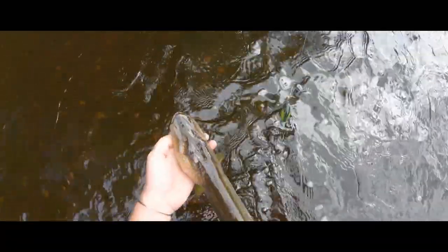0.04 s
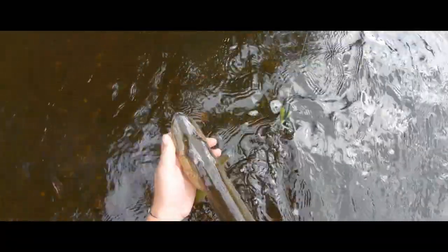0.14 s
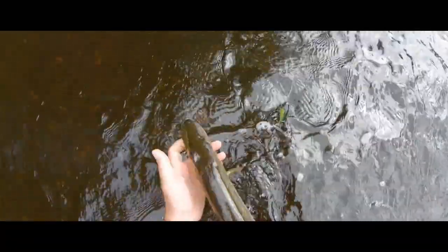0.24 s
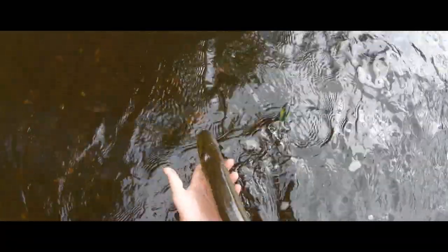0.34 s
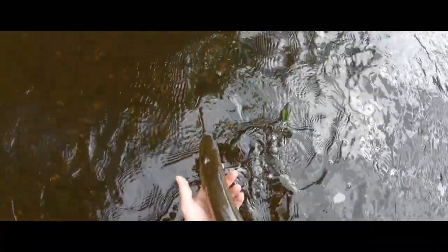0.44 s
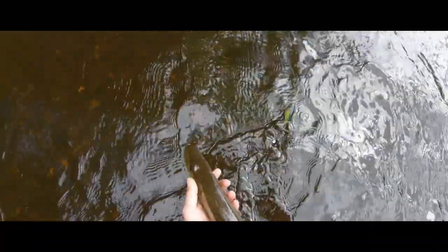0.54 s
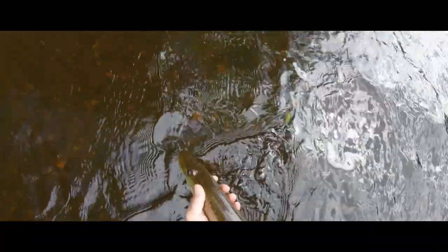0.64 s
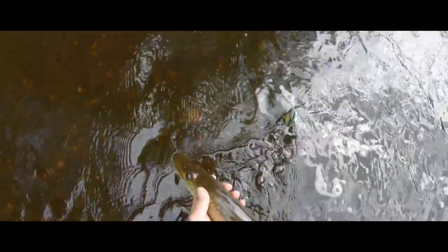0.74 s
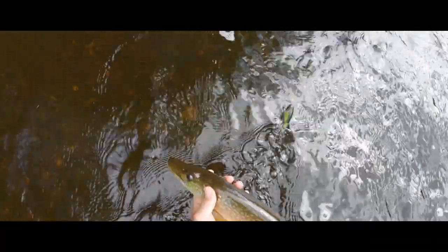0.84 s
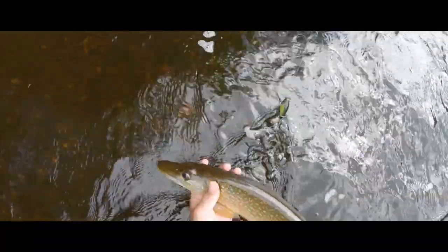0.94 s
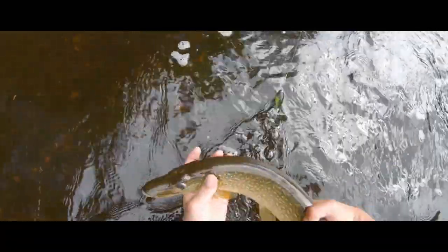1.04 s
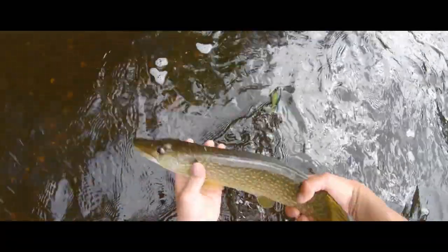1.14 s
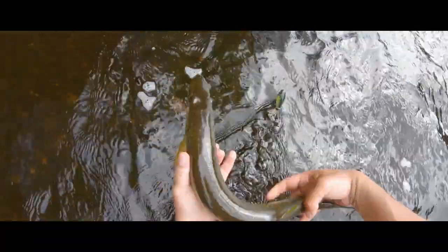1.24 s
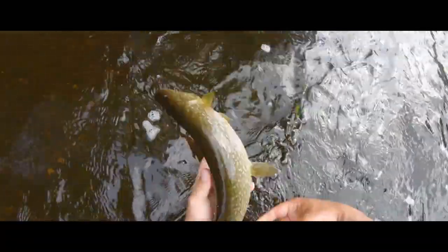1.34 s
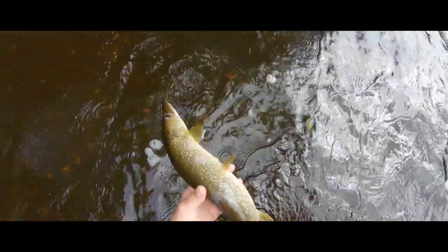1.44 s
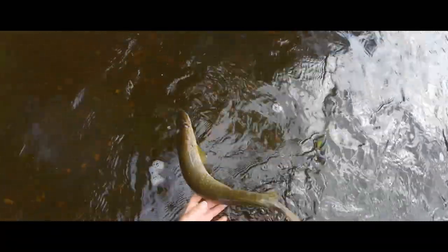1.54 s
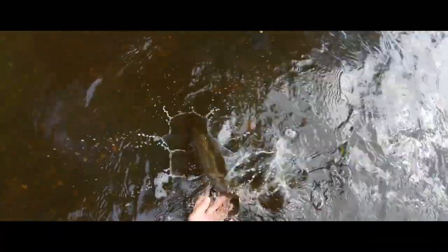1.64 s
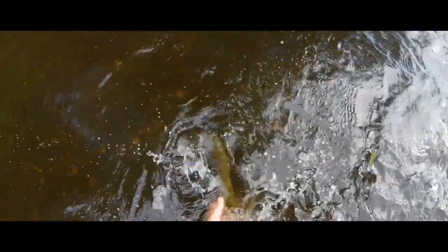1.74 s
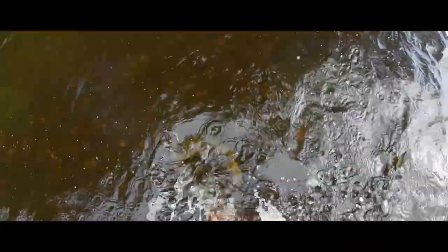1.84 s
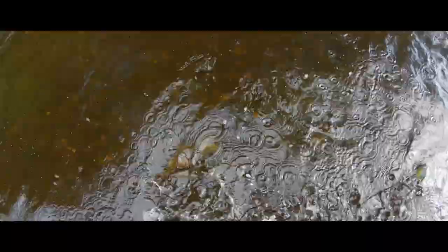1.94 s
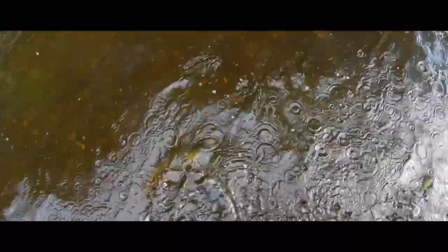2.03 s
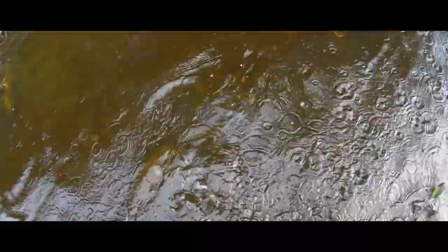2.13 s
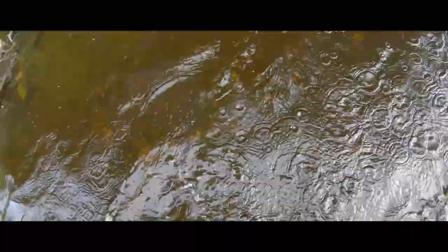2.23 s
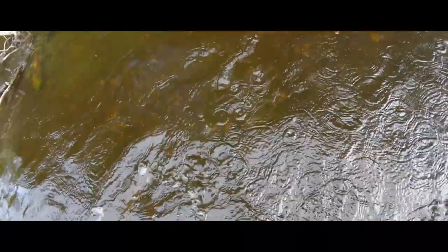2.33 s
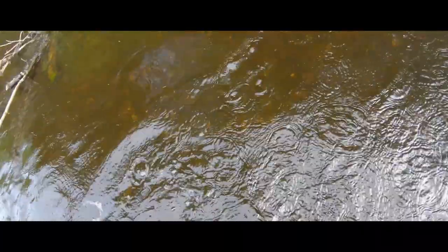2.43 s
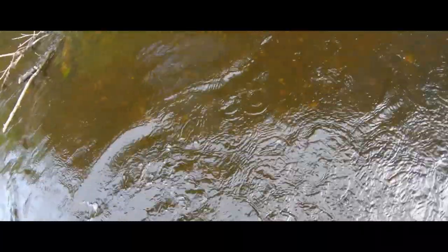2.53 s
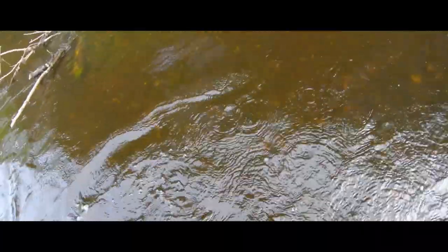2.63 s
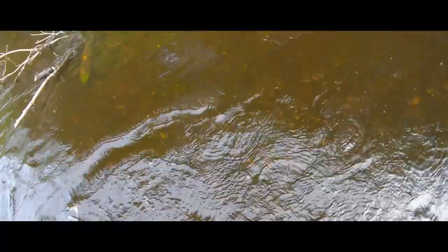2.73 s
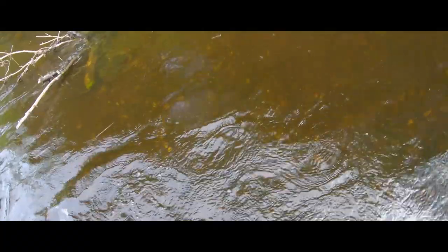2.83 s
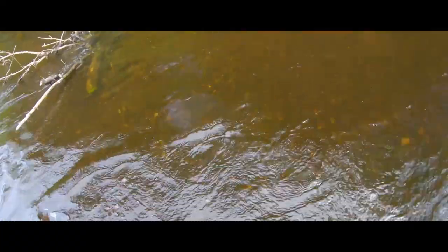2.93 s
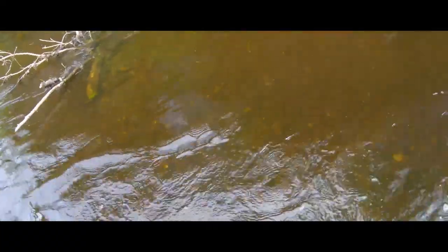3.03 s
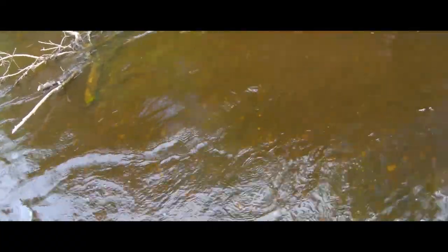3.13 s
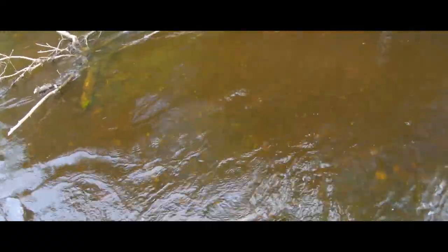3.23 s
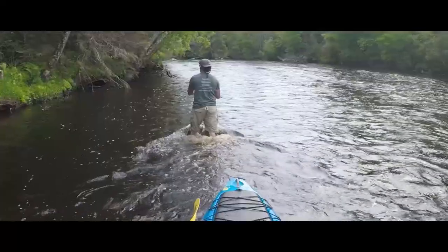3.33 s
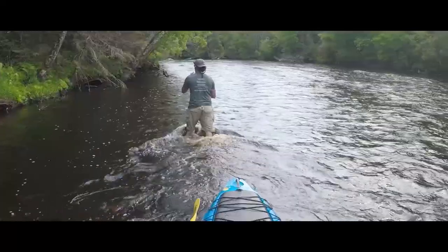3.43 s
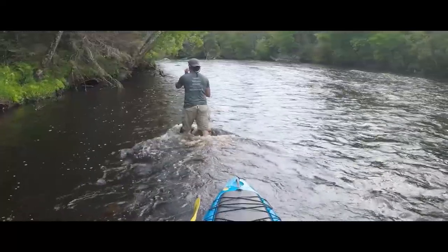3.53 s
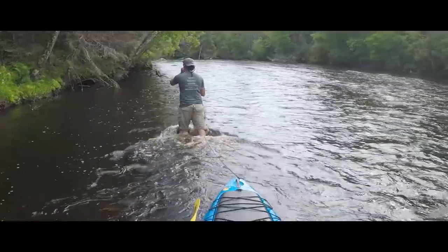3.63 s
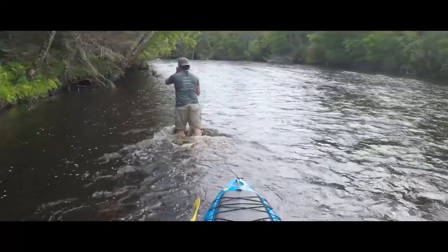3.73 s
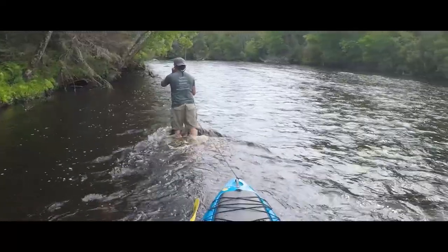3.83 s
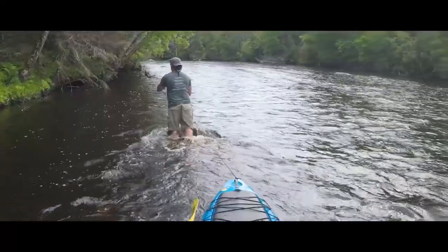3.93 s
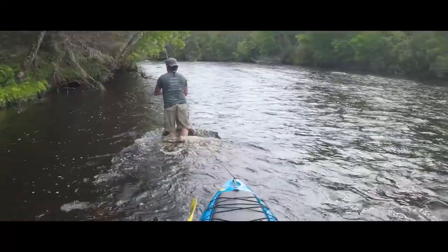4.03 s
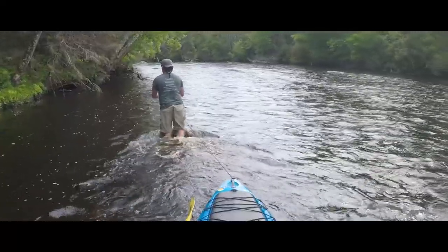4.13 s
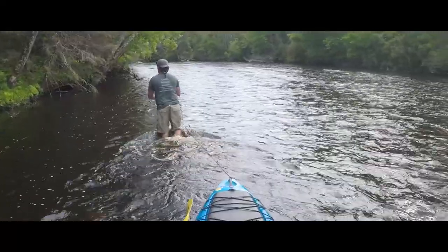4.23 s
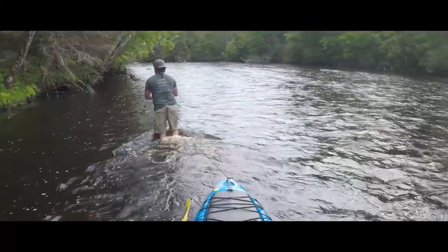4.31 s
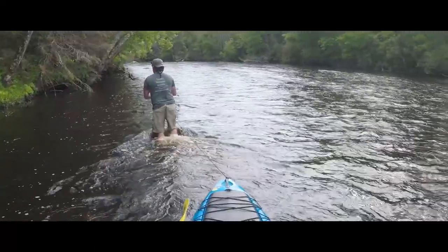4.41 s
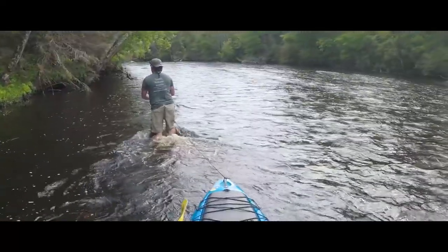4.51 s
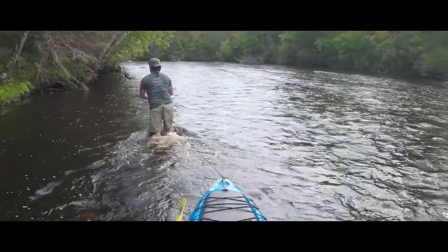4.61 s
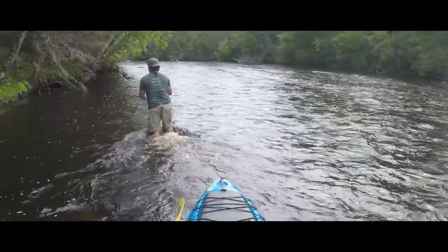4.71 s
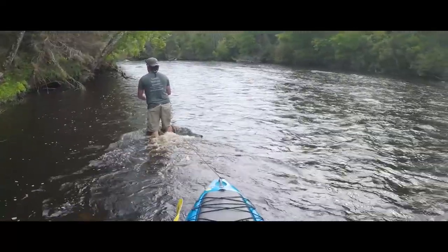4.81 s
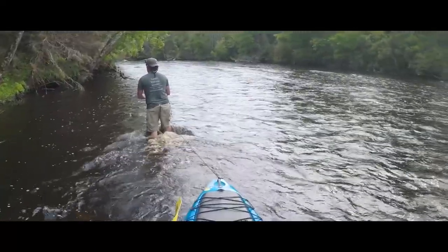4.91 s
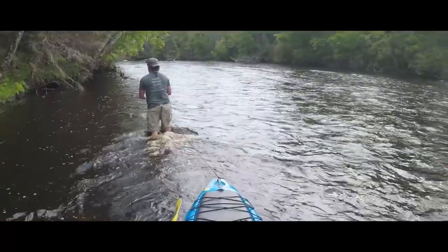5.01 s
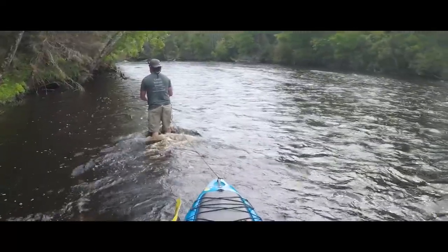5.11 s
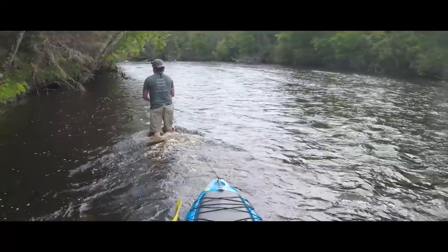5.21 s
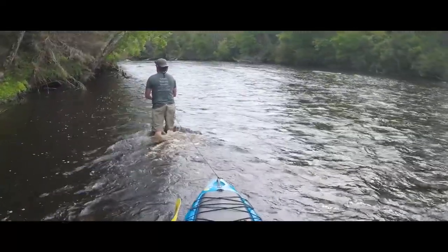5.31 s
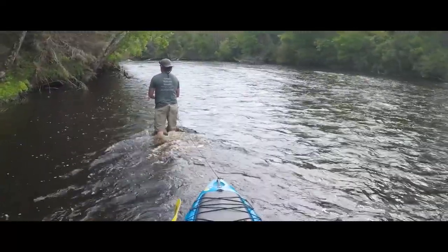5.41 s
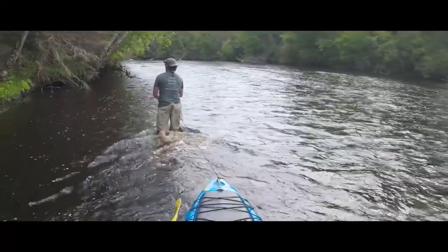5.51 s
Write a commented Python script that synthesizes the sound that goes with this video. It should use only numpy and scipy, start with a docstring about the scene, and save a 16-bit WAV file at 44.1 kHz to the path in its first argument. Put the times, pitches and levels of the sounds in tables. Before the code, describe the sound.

Shallow river water gurgles close up, a fish slaps and thrashes free in a splash, then an abrupt cut to steady midstream rush with low rumble.

```python
"""A shallow river gurgles over rocks at arm's length, mostly noise and crowds of ringing bubbles in stereo.
A fish slaps close to the camera's microphones, thrashes free and leaves spray (impacts) and chirping bubbles.
Then the place jumps to a kayak in midstream, in mono: an even rush of noise, burbling bubbles,
drips ticking on the boat, and the low rumble of the current buffeting the hull."""
import sys
import numpy as np
from scipy import signal
from scipy.fft import rfft, irfft
from scipy.io import wavfile
from scipy.ndimage import uniform_filter1d

SR = 44100
rng = np.random.default_rng(int(sys.argv[2]) if len(sys.argv) > 2 else 0)


def digitize_waveform(pressure):
    """Quantize a signal to 16-bit integers and store it at the path in sys.argv[1].

    Rows of a 2-D input are taken as channels; values are limited to [-1, 1].
    """
    field = np.atleast_2d(pressure).T
    bounded = np.clip(field, -1, 1)
    quanta = np.round(bounded * 32767).astype(np.int16)
    wavfile.write(sys.argv[1], SR, quanta)


N = 245195
TIME = np.arange(N) / SR
CUT_S = 3.312  # the microphones leave the shallows for the kayak

# balance of the two microphone ports over the shallows: f/Hz, left-right level/dB
PORT_BALANCE = [(200, -0.5), (380, 1), (700, -6), (1290, -10.5), (2400, -6.5), (4400, -3.5), (8100, -4.5),
                (15000, 3.5)]
# spectrum of the hiss when water hits water or the camera: f/Hz, level/dB
SPLASH_TICK = [(500, -5), (2500, 16.5), (4500, 15.5), (7000, 8), (9400, 3.5), (11500, -1.5), (16000, -11)]
# strokes of the fish's tail: t/s, slap level/dB, sharpness 0-1, foam level/dB, foam decay/s, cavity f/Hz
TAIL_STROKES = [(1.670, -8.5, 0.86, -37.5, 0.036, 544), (1.780, -4, 0.58, -28.5, .004, 303),
                (1.8012, -10.5, 0.2, -30, 0.027, 720), (1.8188, -13, 0.6, -34, 0.039, 377),
                (1.8397, -7, 0.2, -31.5, 0.0067, 660), (1.852, -16, 0.2, -31, 0.0061, 320),
                (1.8725, -23, .25, -34.5, 0.015, 480)]


def gain_of(db):
    """Decibels to gain."""
    return 10 ** (np.asarray(db) / 20)


def evened(x):
    """Scales to an rms of 1."""
    return x / np.sqrt(np.mean(x ** 2) + 1e-20)


def read(points, hz):
    """Reads a spectrum table on a log-frequency axis."""
    f, value = np.transpose(points)
    return np.interp(np.log(hz + 1), np.log(f + 1), value)


def add(mix, s, sound):
    """Mixes a sound in at time s."""
    part = mix[:, max(round(s * SR), 0):][:, :sound.shape[-1]]
    part += sound[..., :part.shape[1]]


def swell(crest_s, db, half_s):
    """A smooth rise and fall of gain around a crest."""
    return gain_of(db) * np.exp(-.5 * ((TIME - crest_s) / half_s) ** 2)


def burst(s, db, decay_s, attack_s):
    """A gain that rises quickly at time s and dies away."""
    age = np.maximum(TIME - s, 0)
    attack = np.minimum(age / attack_s, 1)
    return gain_of(db) * attack * np.exp(-np.maximum(age - attack_s, 0) / decay_s)


def clumps(depth_db, per_s):
    """A gain that wanders at random, for things that arrive in bunches."""
    slowness = 1 + (np.fft.rfftfreq(N, 1 / SR) / per_s) ** 4
    wander = irfft(rfft(rng.standard_normal(N)) / slowness, N)
    return gain_of(depth_db * evened(wander))


def ports(side_db):
    """Left and right gains with a mean of 1."""
    left = gain_of(side_db)
    return np.array([2 * left, 2 + 0 * left]) / (1 + left)


def colour(x, spectrum):
    """Gives a sound a spectrum, causally, so that clicks keep their sharp fronts."""
    size = 4096
    log_gain = np.log(gain_of(read(spectrum, abs(np.fft.fftfreq(size, 1 / SR)))))
    minimum_phase = np.exp(np.conj(signal.hilbert(log_gain)))
    taps = np.fft.ifft(minimum_phase).real[:size // 2]
    return signal.fftconvolve(x, taps)[:len(x)]


def spread(pair):
    """Two unrelated sounds become one that leans mostly to the right of the two ports."""
    # likeness of the two ports: f/Hz, share 0-1
    port_likeness = [(60, 0.077), (290, 0.92), (640, 0.78), (1400, 0.6), (3100, 0.45), (6800, 0.043),
                     (15000, 0.048)]
    hz, (a, b) = np.fft.rfftfreq(N, 1 / SR), rfft(pair)
    same = read(port_likeness, hz)
    mid, side = a * np.sqrt(1 + same), b * np.sqrt(1 - same)
    out = irfft(np.array([mid + side, mid - side]) * ports(read(PORT_BALANCE, hz)), N)
    return out / out.mean(0).std()


def wash(spectrum, patchy_db):
    """Countless far bubbles: noise whose level wanders in small patches of time and pitch."""
    hz = np.fft.rfftfreq(1024, 1 / SR)
    a, b, patches = rng.standard_normal((N // 256 + 5, len(hz), 3)).T
    patches = uniform_filter1d(patches, size=7, axis=0)  # across pitch
    patches = evened(uniform_filter1d(patches, size=4, axis=1))  # across time
    depth = patchy_db / (1 + hz / 5000)  # the treble is smoother
    level_db = read(spectrum, hz)[:, None] + depth[:, None] * patches
    z = (a + 1j * b) * gain_of(level_db)
    return evened(signal.istft(z, nperseg=1024, noverlap=768)[1][:N])


def patter(spectrum, per_s, spread_db):
    """Random tiny impacts, mostly small, a few large."""
    size = gain_of(spread_db * np.minimum(rng.exponential(1, N), 4)) * rng.choice([-1, 1], N)
    struck = rng.random(N) < per_s / SR
    return evened(colour(size * struck, spectrum))


def bubble(hz, swell_ms, decay_ms, glide):
    """A pocket of air swells, rings and dies; its pitch slides (octaves) as it changes shape and depth."""
    swell_ms, decay_ms = max(swell_ms, .1), max(decay_ms, .2)
    ms = np.arange(int((swell_ms + 5 * decay_ms) * SR / 1000)) * 1000 / SR - swell_ms  # 0 at the peak
    rise = np.cos(np.pi / 2 * np.minimum(ms / swell_ms, 0)) ** 2
    shape = rise * np.exp(-np.maximum(ms, 0) / decay_ms)
    pitch = hz * 2 ** (glide * np.clip(ms / (swell_ms + decay_ms), -1, 1.5))
    return shape * np.sin(2 * np.pi * np.cumsum(pitch) / SR)


def gurgle(span, low_hz, high_hz, spread_db, cycles, tilt_db, rise, count):
    """A crowd of bubbles, mostly rising in pitch; high ones die soonest; gain tilts by tilt_db an octave."""
    out = np.zeros((2, N))
    when, pitch, size, swelling, ring, slide, place = rng.random((count, 7)).T
    hz = low_hz * (high_hz / low_hz) ** pitch
    life_ms = 1000 * cycles / hz
    gain = gain_of(spread_db * size ** 2 + tilt_db * np.log2(hz / low_hz))
    gain = gain * ports(read(PORT_BALANCE, hz) + 18 * (place - .5))
    start = span[0] + when * (span[1] - span[0])
    glide = rise * (slide - .33) / (1 + (hz / 3000) ** 2)  # tiny bubbles die before they can rise far
    swell_ms, decay_ms = life_ms * (0.014 + swelling ** 2), life_ms * (0.63 + ring)
    for k in range(count):
        add(out, start[k], gain[:, k, None] * bubble(hz[k], swell_ms[k], decay_ms[k], glide[k]))
    return evened(out) * np.sqrt((span[1] - span[0]) * SR / N)  # rms of 1 within the span


def hits(rows, tick_spectrum, ring_shift, scatter, thud_hz, thud_ms, thud_db):
    """Each drop gives a hissing tick, a short ring of the camera housing and a low, sinking thud."""
    # ring of the housing under a drop: f/Hz before ring_shift, level/dB, t60/ms
    housing_modes = [(3400, 20, 1.3), (3810, 11.5, 2.9), (4286, 2, 2.14)]
    out, t = np.zeros((2, N)), np.arange(SR // 20) / SR
    ms = t * 1000
    ring = sum(gain_of(db - 60 * ms / t60) * np.sin(2 * np.pi * hz * ring_shift * t)
               for hz, db, t60 in housing_modes)
    ring *= (1 - np.exp(-ms / .5)) ** 2  # soft onset
    thud = gain_of(thud_db) * np.exp(-ms / thud_ms) * np.sin(2 * np.pi * thud_hz * t / (1 + ms / 12))
    for s, db, sharp, decay_ms in rows:
        hiss = rng.standard_normal((3, len(t))) * np.exp(-ms / decay_ms)
        width = 0.5 * (s < CUT_S)  # mono at the kayak
        tick = np.array([colour(hiss[0] + width * own, tick_spectrum) for own in hiss[1:]])
        # the first contact strikes hardest; a drop that shatters keeps striking after it
        strikes = (ms == 0) + scatter * sharp * hiss[0]
        body = signal.fftconvolve(strikes, ring)[:len(t)]
        drop = sharp * tick / abs(tick).max() + (1 - sharp) * body / abs(body).max() + thud
        add(out, s, gain_of(db) * drop)
    return out


def rumble(afloat):
    """Slow swings of pressure on the camera, alike in both channels, strong where waves buffet the hull."""
    # spectrum of the pressure swings: f/Hz, level/dB
    pressure_spectrum = [(2, 0.5), (6, 3), (14, 1.5), (22, -10), (30, -9.5), (45, -22.5), (63, -21.5),
                         (85, -42.5), (120, -55), (250, -97)]
    # waves that push against the kayak: t/s at the crest, added level/dB
    wave_rows = [(3.4, -29), (3.78, -29.5), (4.5, -36), (4.92, -43), (5.35, -37.5)]
    still_db, hull_db, wave_half_s = -71.5, -29, 0.083  # at all times; added afloat; half width of a wave
    hz = np.fft.rfftfreq(N, 1 / SR)
    noise = irfft(rfft(rng.standard_normal(N)) * gain_of(read(pressure_spectrum, hz)), N)
    buffet = gain_of(hull_db) + sum(swell(s, db, wave_half_s) for s, db in wave_rows)
    return (gain_of(still_db) + afloat * buffet) * evened(noise)


def midstream():
    """The wide river rushes as patchy noise, and bubbles burble where water laps around the kayak."""
    # spectrum of the distant rush: f/Hz, level/dB
    rush_spectrum = [(60, -28), (120, 4.5), (200, -3), (330, 1.5), (680, 9), (1150, 5), (1950, 0.5),
                     (2600, -3), (4500, -9.5), (6400, -13.5), (8200, -13.5), (9300, -20), (13500, -21.5),
                     (15500, -31)]
    # laps against the kayak: t/s at the crest, added burble level/dB, half width/s
    lap_rows = [(3.66, -54, .11), (4.11, -47.5, 0.067), (4.46, -47.5, 0.038), (5.04, -56.5, 0.075),
                (5.38, -54, 0.31)]
    span = (3.3, 5.56)  # s
    rush = gain_of(-48.5) * wash(rush_spectrum, patchy_db=3.5)
    burble = gurgle(span, low_hz=240.8, high_hz=2374, spread_db=17, cycles=4.1,
                    tilt_db=1.0, rise=0.61, count=650).mean(0)
    fizz = gurgle(span, low_hz=3000, high_hz=11360, spread_db=8, cycles=4.3,
                  tilt_db=1.0, rise=0.33, count=300).mean(0)
    lapping = gain_of(-59.5) + sum(swell(*lap) for lap in lap_rows)
    return rush + lapping * (burble + gain_of(-13) * fizz)


def shallows():
    """Water running over rocks at arm's length: wash, gurgle and a fine trickle of droplets."""
    # spectrum of the wash close by: f/Hz, level/dB
    wash_spectrum = [(18, -54), (30, 14), (93, -25), (141, -11), (199, -7), (303, -11.5), (554, -5),
                     (1160, -0.5), (1320, -1.5), (1860, -5.5), (3490, -12), (5310, -19), (7670, -21.5),
                     (13000, -35.5), (16000, -70)]
    # surges over the rocks: t/s at the crest, added level/dB ahead of the layer gain, half width/s
    surge_rows = [(.36, -44, 0.032), (.6, -47, 0.081), (1.25, -48, 0.15), (1.9, -40.5, 0.14),
                  (2.21, -38.5, 0.048), (2.76, -41.5, 0.092), (2.93, -47.5, 0.098)]
    span = (0, 3.33)  # s
    surging = 1 + sum(swell(*surge) for surge in surge_rows) / gain_of(-51)  # 1 between surges
    body = spread([wash(wash_spectrum, patchy_db=7.0) for _ in range(2)])
    steady = gain_of(-44.5) * surging ** 0.15  # the wash barely follows the surges
    bubbles = gurgle(span, low_hz=420, high_hz=3550, spread_db=16.0, cycles=4.94,
                     tilt_db=3.0, rise=0.94, count=1300)
    trickle = gurgle(span, low_hz=2450, high_hz=9240, spread_db=15.5, cycles=5.7,
                     tilt_db=0.5, rise=0.99, count=900)
    return steady * (body + gain_of(-13.5) * trickle) + gain_of(-53) * surging * bubbles


def gulps():
    """Air folded under swells for a few cycles and rings; over the shallows most higher gulps lean right."""
    # gulps: t/s at the peak, level/dB, f/Hz, decay/ms, rise/octaves
    gulp_rows = [(.235, -32.5, 810, 2.7, -0.84), (.33, -35, 807, 19, 0.3), (.405, -39, 439, 18, 0),
                 (.705, -30, 1050, 3.4, 0.74), (.768, -42, 170, 27, 0.37), (.86, -31.5, 980, 4.8, 0.62),
                 (.977, -32, 1107, 5.3, 0.063), (1.102, -30, 1070, 11, -0.11),
                 (1.156, -27, 1037, 2.4, -0.076), (1.227, -38, 795, 12.5, 1), (1.383, -32, 920, 3.9, 0.64),
                 (1.681, -21, 420, 10.4, 0.32), (1.738, -23, 990, 6.8, -0.038), (1.773, -28, 1050, 5, 0),
                 (1.88, -24.5, 187.7, 24, .4), (1.877, -19.5, 1160, 14.4, .1),
                 (1.931, -25.5, 307, 13.6, 0.61), (1.988, -23, 724, 17.5, 0.24),
                 (2.015, -25.5, 1027, 4.8, 0.4), (2.108, -31, 846, 16, -0.26),
                 (2.139, -31, 424, 20.5, -0.14), (2.143, -22, 960, 4.5, -0.46),
                 (2.188, -25, 473, 18.3, 0.25), (2.21, -29, 1257, 6.3, 0.95), (2.233, -29, 595, 13, -0.27),
                 (2.452, -25.5, 1200, 1.8, 0.81), (2.509, -40, 213, 26, 0), (2.64, -28.5, 817, 10.4, -0.18),
                 (2.703, -34.5, 204, 30, 0.33), (2.7, -21.5, 441, 3, 0.37), (2.71, -22, 853, 4.2, 0.53),
                 (2.717, -29.5, 538, 13.8, 0.65), (2.772, -34, 617, 19.5, .6), (2.904, -34, 595, 14, 0.76),
                 (2.965, -41.5, 283, 21, -0.74), (3.18, -34.5, 895, 19.3, -0.19),
                 (3.254, -32.5, 1260, 3.3, 0.25), (3.541, -29, 1324, 3.6, 0), (3.797, -34.5, 487, 22, .1),
                 (4.0, -38.5, 303, 16, -0.043), (4.315, -33, 684, 3, 1), (4.837, -26.5, 592, 7, 0.073),
                 (4.951, -27, 579, 6.1, 0.094), (5.002, -35, 937, 10.5, 0.51),
                 (5.156, -34, 1760, 3.5, 0.013), (5.178, -41, 248, 8, -0.26), (5.319, -30, 690, 3, 0.13),
                 (5.394, -31, 530, 2.2, 0.54)]
    swell_cycles = 3.77
    out = np.zeros((2, N))
    for s, db, hz, decay_ms, rise in gulp_rows:
        swell_ms = 1000 * swell_cycles / hz
        side_db = (1.3 * read(PORT_BALANCE, hz) - 1.5) * (s < CUT_S)  # centred at the kayak
        sound = bubble(hz, swell_ms, decay_ms, rise)
        add(out, s - swell_ms / 1000, gain_of(db) * ports(side_db)[:, None] * sound)
    return out


def pops():
    """Small bubbles burst at the surface: each starts almost at once and falls in pitch as it dies."""
    # pops: t/s, level/dB, f/Hz, decay/ms, left-right level/dB
    pop_rows = [(.112, -30.5, 2200, 3, 3), (.329, -19.5, 2260, .8, -2), (.357, -23.5, 1920, 2.6, -2),
                (.369, -30, 3360, 1.7, -4), (.447, -30, 2930, 1.5, 0), (.434, -18, 2010, 0.65, 1),
                (.464, -28, 1050, 2.5, -8), (.588, -28, 2330, 1.5, 0), (0.6183, -24, 3270, 0.52, -19),
                (.823, -24, 2110, 2.7, -3), (.908, -27.5, 1730, 2.4, -5), (.911, -24, 2690, 2.2, -7),
                (.974, -22, 1940, 1.6, -4), (1.12, -31.5, 2160, 4.1, 3), (1.305, -17.5, 1070, 1.2, -11),
                (1.453, -19.5, 673, 2.75, -4), (1.728, -20.5, 2530, 1.9, -5), (1.872, -9.5, 900, 1.95, -9),
                (1.895, -24, 2220, 3.5, -1), (2.044, -23, 2650, 0.96, -22), (2.069, -26.5, 3420, 1.9, -8),
                (2.078, -26.5, 2230, 5, -17), (2.1346, -23, 3000, .7, -7), (2.24, -24.5, 2180, 1.9, -28),
                (2.674, -30.5, 1265, 13, -25), (2.738, -29, 2630, 7, -7), (2.815, -13, 1445, 2.04, -10),
                (3.133, -27, 1990, 3.4, -20), (3.206, -36, 2120, 5.4, -24)]
    swell_share, glide = 0.32, -0.23  # share of the decay; octaves
    out = np.zeros((2, N))
    for s, db, hz, decay_ms, side_db in pop_rows:
        sound = bubble(hz, swell_share * decay_ms, decay_ms, glide)
        add(out, s, gain_of(db) * ports(side_db)[:, None] * sound)
    return out


def drips():
    """Drips tick on the kayak, each with a hiss, a ring and a thud."""
    # drips: t/s, level/dB, sharpness 0-1, decay/ms
    drip_rows = [(3.36, -33, 1, 0.84), (3.537, -27, 0.62, 1.7), (3.573, -33.5, 0.76, 1.1),
                 (3.853, -32.5, 0.68, 4.2), (3.994, -23, 0.51, 0.93), (4.311, -26, 0.42, 2.2),
                 (4.648, -34, .52, 1.8), (4.771, -28.5, 0.54, 5.1), (4.832, -33.5, 0.74, 2.8),
                 (4.945, -27.5, 0.2, 3.6), (5.006, -30.5, 0.78, 0.99), (5.306, -29, 0.62, 5.6),
                 (5.390, -29.5, 0.8, 2.7)]
    # spectrum of their hiss: f/Hz, level/dB
    drip_spectrum = [(500, -45), (2500, 9), (4500, 5), (7000, 6), (9500, 2), (12000, 0.5), (16000, -14)]
    return hits(drip_rows, drip_spectrum, ring_shift=1.144, scatter=0.93,
                thud_hz=634, thud_ms=4.2, thud_db=-15)


def slaps():
    """Drops and slaps of water close to the microphones hiss, ring the housing and thud."""
    # slaps: t/s, level/dB, sharpness 0-1, decay/ms
    slap_rows = [(.1845, -29, 0.96, 3.6), (.2665, -29, 1, 0.73), (.6186, -28.5, .4, 1),
                 (1.0085, -21, 0.7, 1.3), (1.2505, -26, 0.17, 2.7), (1.3047, -21.5, 0.61, 5.4),
                 (1.3785, -26, 0.9, 1.1), (1.4551, -1.5, 0.25, 1.2), (1.6025, -25, 0.73, 2.1),
                 (1.6775, -12.5, 0.7, 1.9), (1.9833, -15.5, 0.75, 0.92), (2.1425, -24, 0.9, 2.4),
                 (2.297, -26, 0.9, 1.2), (2.9098, -26.5, 0, .42)]
    return hits(slap_rows, SPLASH_TICK, ring_shift=1.0, scatter=0.43,
                thud_hz=420, thud_ms=0.54, thud_db=-13)


def bumps():
    """The struggling fish bumps the camera: dull low thumps of noise that reach both ports alike."""
    # bumps: t/s, level/dB, decay/ms
    bump_rows = [(1.305, -30, 7.1), (1.455, -33.5, 16), (1.874, -37.5, 32), (2.016, -46, 25)]
    out, t = np.zeros((2, N)), np.arange(SR // 5) / SR
    for s, db, decay_ms in bump_rows:
        push = rng.standard_normal(len(t)) * np.exp(-1000 * t / decay_ms)
        thump = colour(push, [(20, -4.0), (60, -10), (150, 0), (400, -11.5), (1500, -82)])  # f/Hz, level/dB
        add(out, s, gain_of(db) * thump / abs(thump).max())
    return out


def thrash():
    """The tail beats the water into foam and bubbles; spray swishes and patters in uneven bursts."""
    # spectra of foam and of spray: f/Hz, level/dB
    foam_spectrum = [(35, -67), (60, -65), (202, -12), (250, -7), (492, 1), (785, -0.5), (1060, -6),
                     (1200, 0.5), (1740, -12.5), (3420, -14.5), (9350, -18), (12700, -54), (16000, -82)]
    spray_spectrum = [(400, -20), (1500, 0), (3400, -0.5), (5500, -4.5), (7500, -8), (9300, -16.5),
                      (11000, -16), (13000, -26), (16000, -36)]
    # bursts of spray, a swish before the big slap, then drops falling back:
    # t/s, level/dB ahead of the layer gains, decay/s
    spray_rows = [(1.72, -29, 0.03), (1.759, -42, 0.033), (1.931, -38, 0.21), (2.04, -48, 0.037),
                  (2.129, -33, 0.0081), (2.25, -62, 0.13), (2.819, -43, 0.11)]
    span = (1.65, 3.33)  # s
    beaten = sum(burst(s, db, decay_s, attack_s=0.0052) for s, _, _, db, decay_s, _ in TAIL_STROKES)
    # the stirred water settles slowly, then quickly once the fish has gone
    stir_s, gone_s = 1.88, 2.78
    settling_db = 7.5 * (TIME - stir_s) + 42 * np.maximum(TIME - gone_s, 0)  # dB per s
    stirred = (TIME > stir_s) * gain_of(-38 - settling_db)
    spray_bursts = sum(burst(*row, attack_s=0.0076) for row in spray_rows)
    uneven_bursts = clumps(depth_db=4.0, per_s=25) * spray_bursts
    foam = spread([patter(foam_spectrum, per_s=3000, spread_db=3) for _ in range(2)])
    bubbles = gurgle(span, low_hz=640, high_hz=4340, spread_db=17, cycles=4.7,
                     tilt_db=4.2, rise=0.68, count=1600)
    chirps = gurgle(span, low_hz=343, high_hz=3670, spread_db=12, cycles=4.44,
                    tilt_db=1.0, rise=0.66, count=700)
    drops = gurgle(span, low_hz=2487, high_hz=9740, spread_db=0, cycles=6.5,
                   tilt_db=-7.5, rise=0.64, count=700)
    spatter = spread([patter(spray_spectrum, per_s=500, spread_db=2) for _ in range(2)])
    spray = gain_of(-5.5) * drops + gain_of(-4.0) * spatter
    splash = beaten * (gain_of(1.0) * foam + gain_of(-0.5) * bubbles + spray)
    settling = stirred * (gain_of(-9) * foam + gain_of(-1.0) * chirps)
    return splash + settling + uneven_bursts * spray


def tail_slaps():
    """Each stroke smacks the surface and opens a cavity whose note sinks."""
    smacks = [(s, db, sharp, 1.9) for s, db, sharp, *_ in TAIL_STROKES]  # decay 1.9 ms
    out = hits(smacks, SPLASH_TICK, ring_shift=0.98, scatter=0.28, thud_hz=420, thud_ms=1.0, thud_db=-14)
    for s, _, _, foam_db, _, hz in TAIL_STROKES:
        cavity = bubble(hz, swell_ms=2.55, decay_ms=3.9, glide=-0.42)
        add(out, s, gain_of(foam_db + 13.5) * cavity)
    return out


def low_cut(x):
    """A steep low cut at 150 Hz, perhaps the camera's wind filter, thins the bass of the water."""
    return signal.sosfilt(signal.butter(4, 150, "highpass", fs=SR, output="sos"), x)


def scene():
    """The shallows with the fish, then the kayak."""
    afloat = np.clip((TIME - CUT_S) / .01, 0, 1)  # the place changes within 10 ms
    near = (1 - afloat) * (shallows() + thrash())
    water = near + gulps() + pops() + drips() + slaps() + tail_slaps()
    return rumble(afloat) + afloat * midstream() + bumps() + low_cut(water)


def record(dry):
    """The recorder's band limit, a low-pass at 15.4 kHz."""
    taps = signal.firwin(255, 15400, window=("kaiser", 9), fs=SR)
    return signal.oaconvolve(dry, taps[None], "same")


dry = scene()
out = record(dry)
digitize_waveform(out)
```